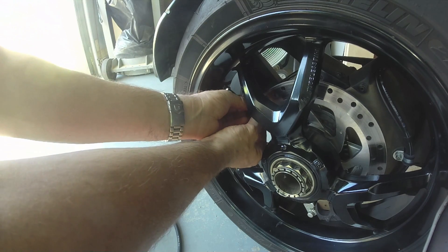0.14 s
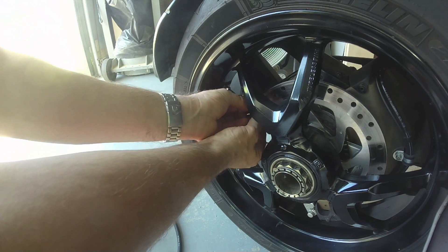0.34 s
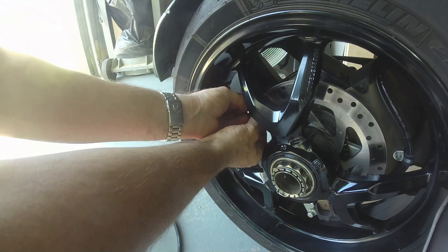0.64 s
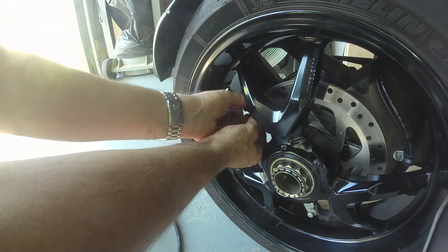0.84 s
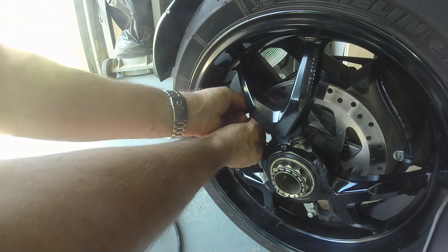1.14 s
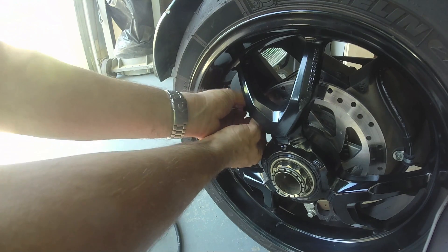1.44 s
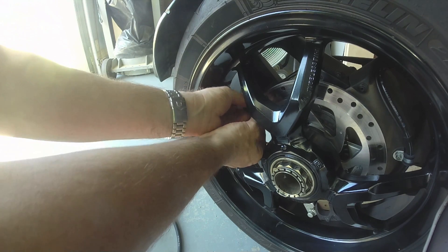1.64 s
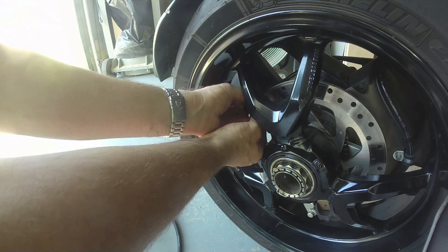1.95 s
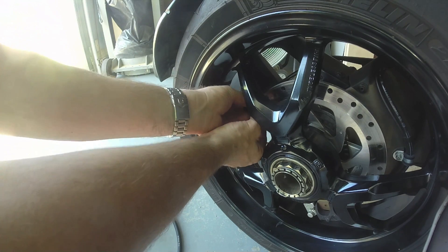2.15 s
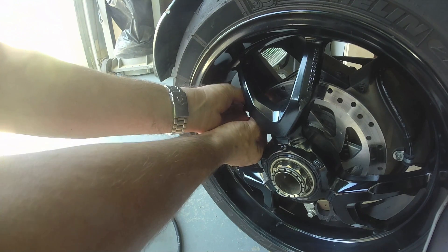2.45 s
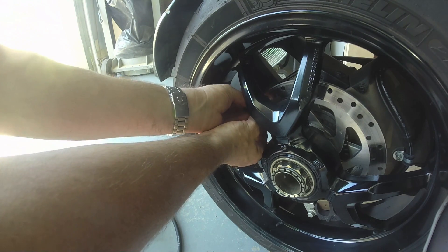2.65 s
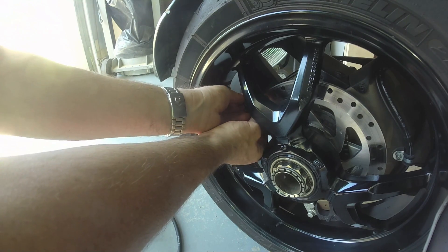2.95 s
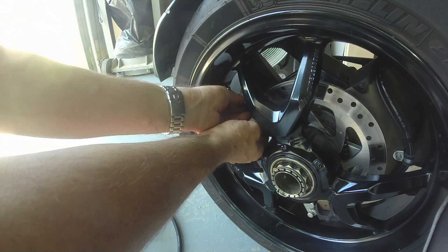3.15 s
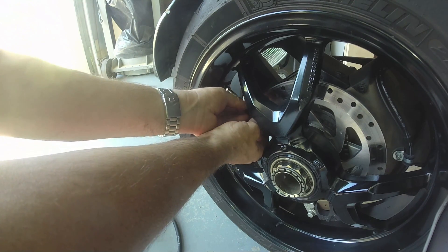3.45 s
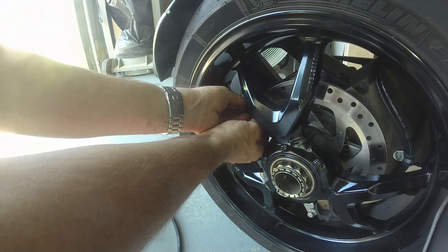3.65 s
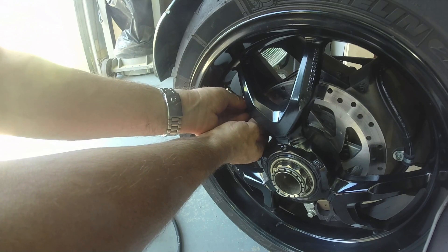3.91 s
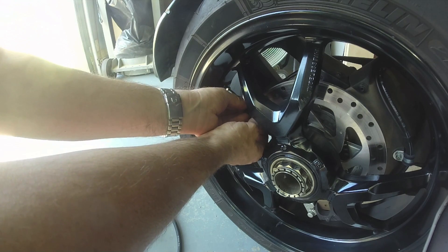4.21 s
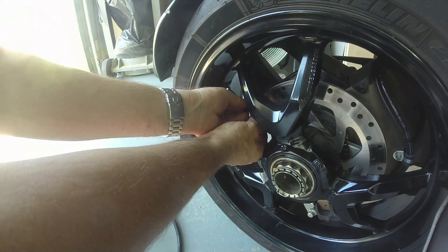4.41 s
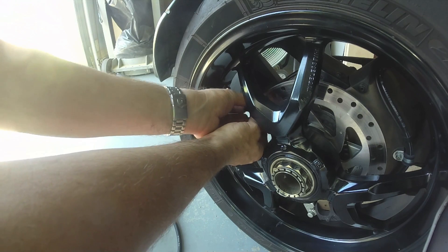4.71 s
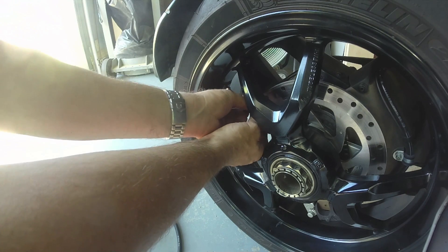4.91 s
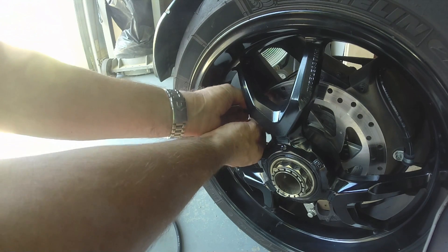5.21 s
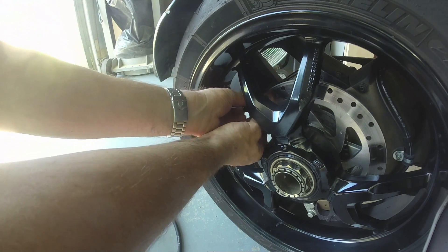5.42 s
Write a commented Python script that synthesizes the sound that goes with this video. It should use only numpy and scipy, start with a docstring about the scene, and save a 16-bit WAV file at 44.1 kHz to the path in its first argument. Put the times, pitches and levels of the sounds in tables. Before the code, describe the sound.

Over a low garage rumble, tool ticks and thin hisses give way to a strong airy rush with a brief whistle and final burst.

```python
"""The core of a tyre valve is unscrewed by hand in a garage, over a low rumble and a distant motor's hum: shaped noise.
At first a thin leak hisses, tool ticks ring in metal modes, and each twist of the tool adds a spurt of power.
Then the jet blows on: its turbulence is noise ringing in the hollows of tool, stem and wheel, louder in one or
another as the fingers cover the jet. At times the sizzle swells into a whistle. At the end the core lets go with a
low puff, a brief swell of resonant noise."""
import sys
import numpy as np
from scipy import signal
from scipy.fft import rfft, irfft
from scipy.io import wavfile

SR = 44100
rng = np.random.default_rng(int(sys.argv[2]) if len(sys.argv) > 2 else 0)


def master(y):
    """Save y as 16-bit WAV."""
    cut = np.clip(np.atleast_2d(y).T, -1, 1)
    pcm = np.round(cut * 32767)  # scale
    wavfile.write(sys.argv[1], SR, pcm.astype(np.int16))


N = 245637


def from_db(db):
    """Decibel law: amplitude gain of a level."""
    return 10 ** (np.asarray(db) / 20)


def to_db(power):
    """Decibel law: level of a power."""
    return 10 * np.log10(power)


def rms_one(x):
    """Normalisation: the mean square becomes 1."""
    return x / np.sqrt(np.mean(x ** 2) + 1e-20)


def in_time(rows):
    """Linear interpolation: each column after the first (t/s) as a value per sample."""
    s, *columns = np.transpose(rows)
    s = np.maximum.accumulate(s)
    return [np.interp(np.arange(N) / SR, s, column) for column in columns]


def drift(rate_hz):
    """Low-passed chance: noise at SR / 20 through two equal one-poles with their corner at rate_hz; spread 1."""
    r = np.exp(-40 * np.pi * rate_hz / SR)
    noise = rng.standard_normal(N // 20 + 2002)
    slow = signal.lfilter([1], [1, -2 * r, r * r], noise)[2000:]   # the run-in is dropped
    return np.interp(np.arange(N) / 20, np.arange(len(slow)), rms_one(slow))


def resonate(x, hz, width_hz):
    """Damped resonance: a pole pair, with gain 1 on top."""
    r = np.exp(-np.pi * width_hz / SR)
    zeros = np.array([1, 0, -1]) * (1 - r * r) / 2
    poles = [1, -2 * r * np.cos(2 * np.pi * hz / SR), r * r]
    return signal.lfilter(zeros, poles, x)


def swell(start, attack, hold, release):
    """Gated flow: power envelope 0-1 with squared ramps; all times in s."""
    t = np.arange(N) / SR - start
    ramps = np.minimum(t / attack, 1 + (attack + hold - t) / release)
    return np.clip(ramps, 0, 1) ** 2


def garage():
    """Slowly growing noise: a rumble of random phase, and a motor's wavering hum that gets louder."""
    # relative spectrum of the rumble: f/Hz, density/dB per Hz
    rumble_spectrum = [(15, -20), (28, -6.5), (40, -10), (60, -8), (95, -1), (150, -6.5), (230, -7.5),
                       (265, -13.5), (310, -7.5), (490, -20.5), (720, -19), (1200, -24.5), (3000, -31),
                       (15000, -39)]
    # its whole level: first/dB, last/dB
    rumble_ends = (-44.5, -43)
    # hum of the distant motor: f/Hz, width/Hz, first level/dB, last level/dB
    motor_tones = [(119.6, 10.3, -49.5, -44.5), (238.55, 2, -54.5, -45)]
    hz = np.arange(N // 2 + 1) * SR / N + 1   # 1 Hz up, so that the logarithm exists at zero
    knot_hz, knot_db = np.transpose(rumble_spectrum)
    shape_db = np.interp(np.log(hz), np.log(knot_hz), knot_db)
    rumble = rms_one(irfft(rfft(rng.standard_normal(N)) * from_db(shape_db), N))
    out = from_db(np.linspace(*rumble_ends, N)) * rumble
    for tone_hz, width_hz, first_db, last_db in motor_tones:
        tone = rms_one(resonate(rng.standard_normal(N), tone_hz, width_hz))
        out += from_db(np.linspace(first_db, last_db, N)) * tone
    return out


def echoes(x):
    """Diffuse reverberation off wheel, floor and walls: its interference prints a fine fixed ripple on the hiss."""
    echo_db, t60_s = -10.5, 0.085   # energy of the tail against the direct sound; time to fall 60 dB
    t = np.arange(int(.2 * SR)) / SR
    tail = rng.standard_normal(len(t)) * from_db(-60 * t / t60_s) * (t > .002)
    tail /= np.sqrt(np.sum(tail ** 2))
    return x + from_db(echo_db) * signal.fftconvolve(x, tail)[:N]


def ticks():
    """Modal excitation: each contact, a click and a brief rattle of noise, rings in the modes of the tool."""
    # contacts of tool and stem: t/s, relative level/dB, strongest pitch f/Hz, rattle t60/s
    contacts = [(.535, -28.5, 1400, .025), (.664, -31.5, 2780, 0.038), (1.698, -24.5, 2200, 0.05),
                (1.889, -17, 800, 0.032), (2.154, -32, 2000, 0.023)]
    # modes of the tool: f/Hz, relative level/dB, t60/s
    tool_modes = [(725, -6, 0.023), (1500, -4, 0.014), (2190, 5, 0.0043), (3200, 7.5, 0.0044),
                  (3680, 1, 0.01), (4400, -5, .007)]
    out, t = np.zeros(N), np.arange(3000) / SR
    for s, tick_db, pitch_hz, rattle_t60 in contacts:
        blow = 0.16 * rng.standard_normal(len(t)) * from_db(-60 * t / rattle_t60)
        blow[0] = -1   # the click
        at = round(s * SR)
        for hz, mode_db, t60 in tool_modes:
            mode = from_db(-60 * t / t60) * np.sin(2 * np.pi * hz * t)
            near = 1 / (1 + np.log2(hz / pitch_hz) ** 2)   # modes near the strongest pitch take most
            rung = signal.fftconvolve(blow, mode)[:len(t)]
            out[at:at + len(t)] += from_db(tick_db + mode_db - 10) * near * rung
    return out


def puff():
    """Sudden release: low noise, resonant twice over, swells and dies as x exp(1 - x)."""
    # the core lets go: start t/s, time to its top/s, level at the top/dB, f/Hz, width per pass/Hz
    release = (5.553, .011, -18, 620, 300)
    start, rise, level_db, hz, width_hz = release
    x = np.maximum(np.arange(N) / SR - start, 0) / rise
    once = resonate(rng.standard_normal(N), hz, width_hz)
    noise = rms_one(resonate(once, hz, width_hz))
    return from_db(level_db) * x * np.exp(1 - x) * noise


def air():
    """Addition of powers: the spurts add to the stream, giving the levels of hiss and roar."""
    # the air that streams on, first a leak, then the jet: t/s, hiss at the core/dB, roar under the fingers/dB
    stream = [(0, -42.5, -62), (.62, -40, -64), (.8, -43, -53), (.84, -51, -70), (1.04, -52, -59),
              (1.14, -39, -50.5), (1.56, -44, -48), (1.67, -39.5, -57), (1.7, -41.5, -60), (1.86, -42, -63),
              (1.95, -45, -49.5), (2.2, -44.5, -64), (2.29, -45, -66), (2.4, -39.5, -46.5),
              (2.46, -44.5, -53.5), (2.64, -26.5, -31), (2.75, -22.5, -32), (2.78, -20.5, -22.5),
              (2.92, -24, -32), (3.0, -16, -30), (3.21, -25.5, -36), (3.32, -20, -30.5), (3.34, -28.5, -31),
              (3.55, -30.5, -27), (3.62, -21.5, -37.5), (3.83, -25.5, -34.5), (4.08, -21.5, -29),
              (4.34, -26.5, -30.5), (4.56, -28, -31), (4.75, -35.5, -40.5), (4.9, -22.5, -28.5),
              (5.07, -19, -25.5), (5.26, -27, -28), (5.285, -30.5, -26), (5.35, -22.5, -28),
              (5.46, -22, -25.5), (5.545, -36, -29.5), (5.57, -30, -31)]
    # a twist of the tool lets a spurt out: start t/s, attack/s, hold/s, release/s, hiss/dB, roar/dB
    spurts = [(0.639, 0.019, .1, 0.075, -36, -50.5), (1.048, 0.033, 0.037, 0.016, -36.5, -34),
              (1.16, 0.021, .005, .02, -37, -61), (1.249, 0.029, 0.07, 0.017, -33, -33),
              (1.357, 0.011, .055, 0.034, -30, -32), (1.7, 0.017, 0.075, .02, -38.5, -53.5),
              (2.3, 0.015, 0.036, 0.019, -31, -29), (2.645, 0.011, 0.051, .035, -17.5, -29),
              (5.292, 0.027, 0.026, 0.05, -22.5, -30), (5.455, 0.017, 0.064, .006, -14.5, -26),
              (5.547, 0.0076, 0.0068, .03, -10.5, -17.5)]
    power = from_db(in_time(stream)) ** 2
    for start, attack, hold, release, hiss_db, roar_db in spurts:
        spurt_power = from_db([[hiss_db], [roar_db]]) ** 2
        power = power + spurt_power * swell(start, attack, hold, release)
    return to_db(power)


def jet_part(level_db, hollows, wander_db, flutter_db, centre_hz=0, spread_hz=1e6):
    """Resonant turbulence: noise rings in each hollow, most in those the jet points at; eddies make it flutter."""
    eddies = rng.standard_normal((2, N)) * from_db(flutter_db * drift(32.0))
    out, power = np.zeros(N), 1e-20
    for k, (hz, width_hz, top_db) in enumerate(hollows):
        # twice through: the skirts fall steeply and leave dark valleys
        pass_width_hz = 1.73 * width_hz
        once = resonate(eddies[k % 2], hz, pass_width_hz)
        rung = resonate(once, hz, pass_width_hz)
        off_aim_db = -20 * np.log10(1 + ((hz - centre_hz) / spread_hz) ** 2)
        gain = from_db(top_db + off_aim_db)
        power = power + gain ** 2 * np.mean(rung ** 2)
        out += gain * from_db(wander_db * drift(9.1)) * rung
    return from_db(level_db) * out / np.sqrt(power)


def roar(level_db):
    """Low cavity resonance: turbulence under the fingers."""
    # hollows: f/Hz, nominal width/Hz, relative level/dB
    low_hollows = [(365, 270, -24), (651, 91, -12), (1020, 304, -11), (1209, 166, -4.5), (1441, 218, -1),
                   (1997, 203, -7)]
    return jet_part(level_db, low_hollows, wander_db=0.26, flutter_db=1.0)


def rush(hiss_db, roar_db, above_blend_db):
    """Middle cavity resonance: the rush in the stem has a level blended from roar and hiss."""
    # hollows: f/Hz, nominal width/Hz, relative level/dB
    stem_hollows = [(2440, 110, -4), (2796, 153, 0), (3242, 260, 1), (3424, 285, -2.5), (3940, 220, -3.5),
                    (4145, 170, -9.5), (4490, 280, -4.5)]
    roar_share = 0.57
    level_db = roar_share * roar_db + (1 - roar_share) * hiss_db + above_blend_db
    return jet_part(level_db, stem_hollows, wander_db=1.24, flutter_db=0.65)


def hiss(level_db, centre_hz):
    """High-pass radiation: turbulence at the core, which radiates little below an edge."""
    # hollows: f/Hz, nominal width/Hz, relative level/dB
    core_hollows = [(4730, 400, -1.5), (5336, 610, 1), (5710, 240, 1.5), (6060, 285, 0.5), (6650, 720, -1),
                    (7420, 540, 1.5)]
    x = jet_part(level_db, core_hollows, wander_db=1.0, flutter_db=0.65, centre_hz=centre_hz, spread_hz=1050)
    return signal.sosfilt(signal.cheby1(6, 1, 4556, "high", fs=SR, output="sos"), x)   # edge in Hz


def sizzle(steady_db, steady_hz):
    """Spectral gathering: each whistle adds power to the sizzle and narrows it about its own pitch."""
    # hollows: f/Hz, nominal width/Hz, relative level/dB
    high_hollows = [(8160, 390, -10.5), (8980, 570, -2), (9700, 490, -3), (10190, 330, -1),
                    (11030, 380, -5), (11760, 780, -5.5), (12900, 700, -4), (14100, 600, -5),
                    (15000, 1200, -7)]
    # swells into a whistle: start t/s, time to its top/s, time to fade/s, level/dB, f/Hz
    whistles = [(3.1, 0.198, 0.029, -28, 11200), (3.559, 0.11, 0.26, -15.5, 10870),
                (4.18, 0.13, 0.11, -27.5, 10000)]
    steady_spread_hz, narrowing = 1950, 0.85   # narrowing: dB of spread lost per dB that a whistle adds
    power = from_db(steady_db) ** 2
    weighted_hz = power * steady_hz
    for start, rise, fade, whistle_db, hz in whistles:
        whistle = from_db(whistle_db) ** 2 * swell(start, rise, 0, fade)
        power = power + whistle
        weighted_hz = weighted_hz + whistle * hz
    level_db = to_db(power)
    spread_hz = steady_spread_hz * from_db(-narrowing * (level_db - steady_db))
    return jet_part(level_db, high_hollows, wander_db=2.56, flutter_db=0.4,
                    centre_hz=weighted_hz / power, spread_hz=spread_hz)


def jet():
    """Superposition: four bands of one air flow, with a slowly changing colour and aim."""
    # slow change of colour: t/s, rush above its blend/dB, steady sizzle above the hiss/dB
    colour = [(0, -3.5, -11.5), (.62, -7.5, -16.5), (.7, -4.5, -10), (1.05, -3, -7), (1.4, -3.5, -11),
              (1.55, -4.5, -3.5), (1.72, -3, -15.5), (2.05, -4, -5.5), (2.22, -2.5, -14), (2.5, -4, -5),
              (2.7, -5, -15.5), (3.12, -1.5, -7.5), (3.33, -1.5, -10), (3.5, -5, -7), (4.0, -1.5, -2),
              (4.06, 2, -11.5), (4.55, -7.5, -9), (4.95, -2.5, -10), (5.1, -2.5, -12), (5.57, -2, -12.5)]
    # where the jet points: t/s, hiss centre f/Hz, steady sizzle centre f/Hz
    aim = [(0, 6280, 8800), (.6, 6060, 8600), (.7, 5750, 10500), (1.6, 5650, 11000), (2.2, 5500, 10100),
           (2.7, 5250, 10500), (3.1, 5600, 10700), (3.37, 5160, 9900), (3.65, 5900, 10400),
           (4.0, 5300, 10600), (4.15, 5100, 10000), (4.65, 5980, 10300), (5.03, 5260, 11000),
           (5.2, 5500, 10300), (5.57, 5730, 10300)]
    hiss_db, roar_db = air()
    rush_above_db, sizzle_above_db = in_time(colour)
    hiss_hz, sizzle_hz = in_time(aim)
    out = hiss(hiss_db, hiss_hz)
    out += roar(roar_db)
    out += rush(hiss_db, roar_db, rush_above_db)
    out += sizzle(hiss_db + sizzle_above_db, sizzle_hz)
    return out


def scene():
    """Superposition at one microphone: both channels are alike, and only the near sources echo."""
    near = jet() + ticks() + puff()
    return np.tile(echoes(near) + garage(), (2, 1))


def record(dry):
    """Filtering and saturation: the housing takes narrow dips out, high peaks are rounded, the top is cut."""
    # dips of the microphone housing: f/Hz, width/Hz, depth/0-1
    housing_dips = [(4500, 100, 0), (8950, 240, 0.58), (11460, 130, 0.3)]
    for hz, width_hz, depth in housing_dips:
        dry = dry - depth * resonate(dry, hz, width_hz)
    rounded = dry / (1 + np.abs(dry / .95) ** 4) ** .25
    return signal.sosfilt(signal.ellip(14, .5, 70, 15290, fs=SR, output="sos"), rounded)   # cut-off in Hz


dry = scene()
out = record(dry)
master(out)
```